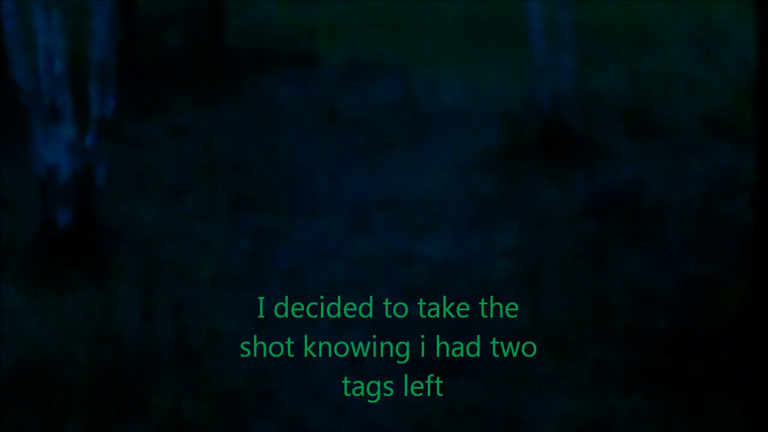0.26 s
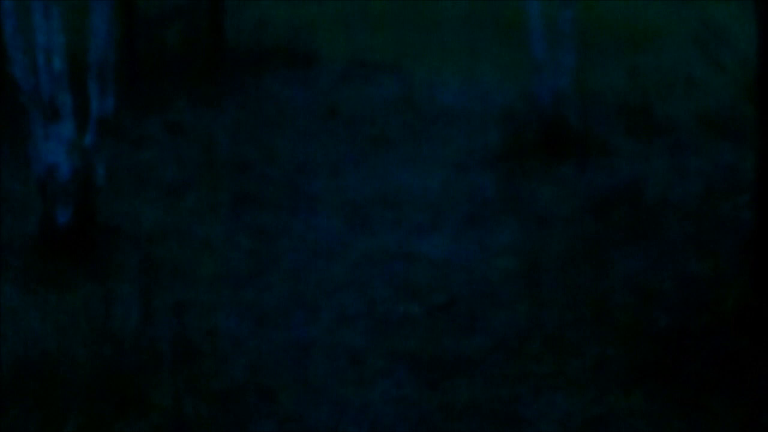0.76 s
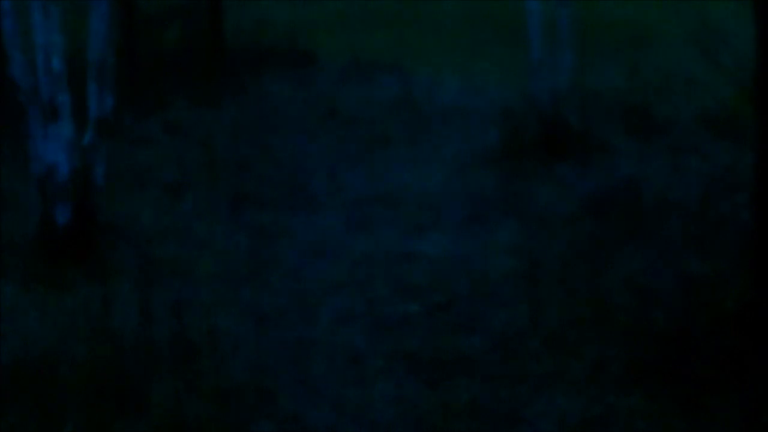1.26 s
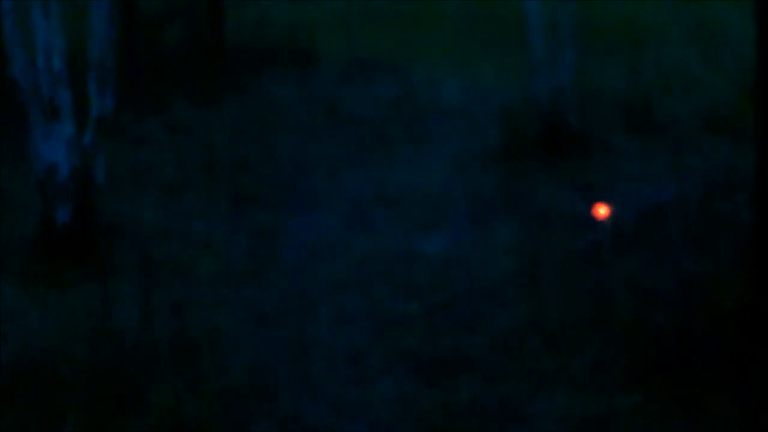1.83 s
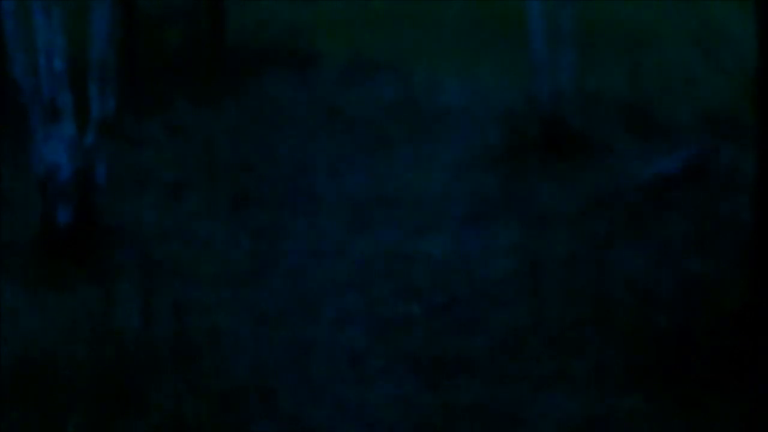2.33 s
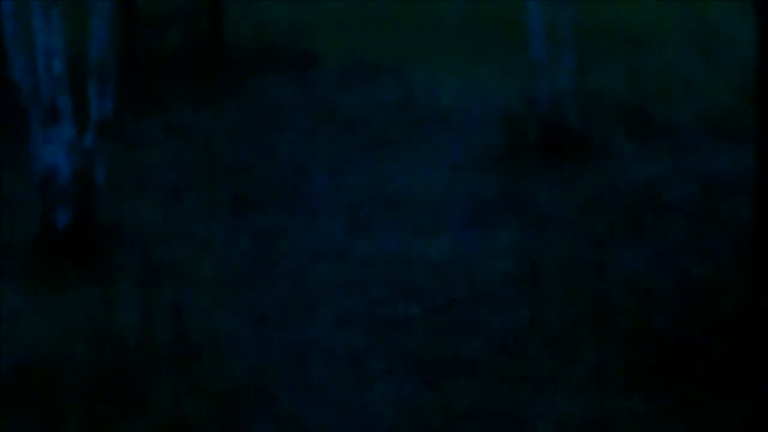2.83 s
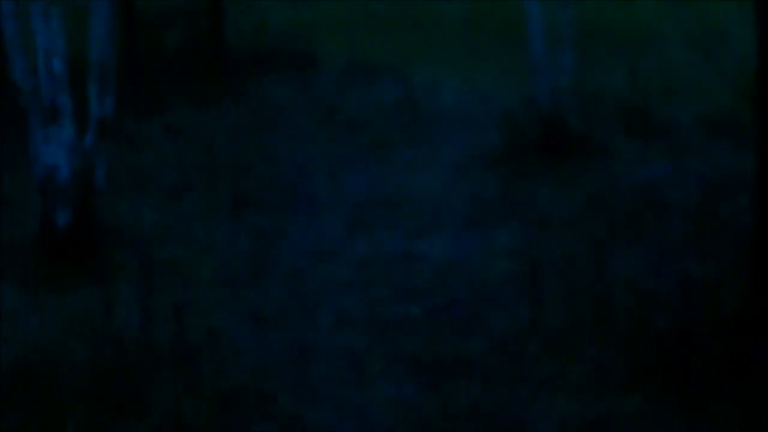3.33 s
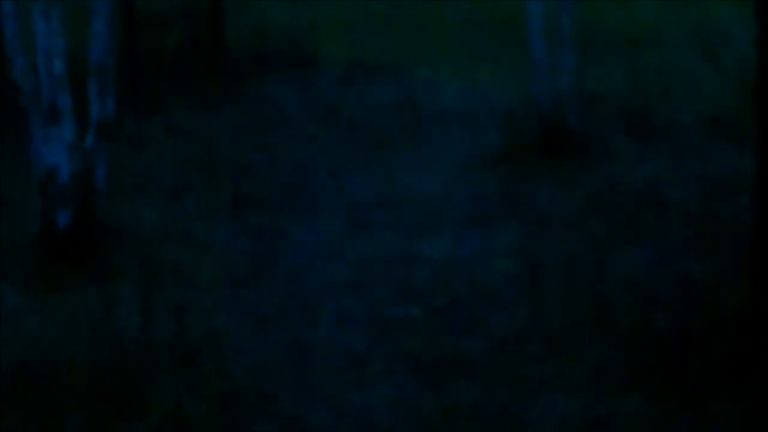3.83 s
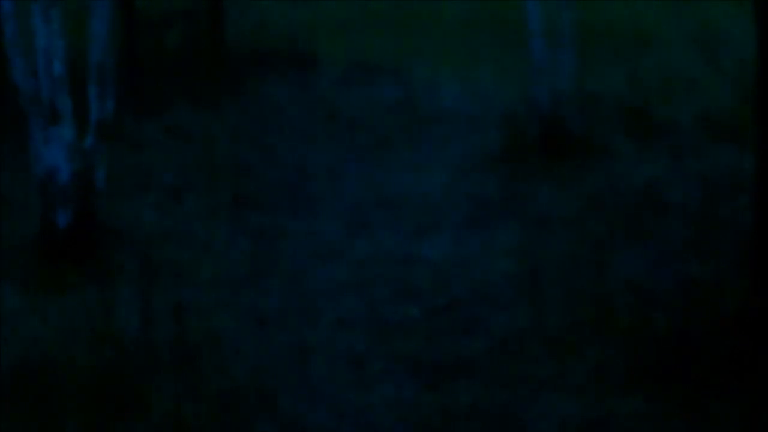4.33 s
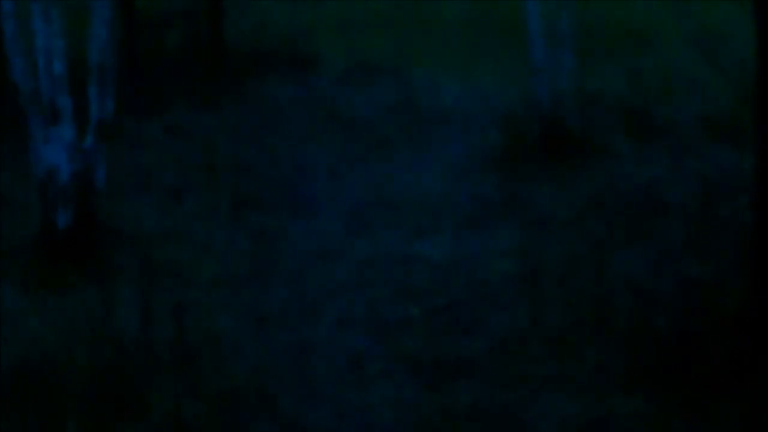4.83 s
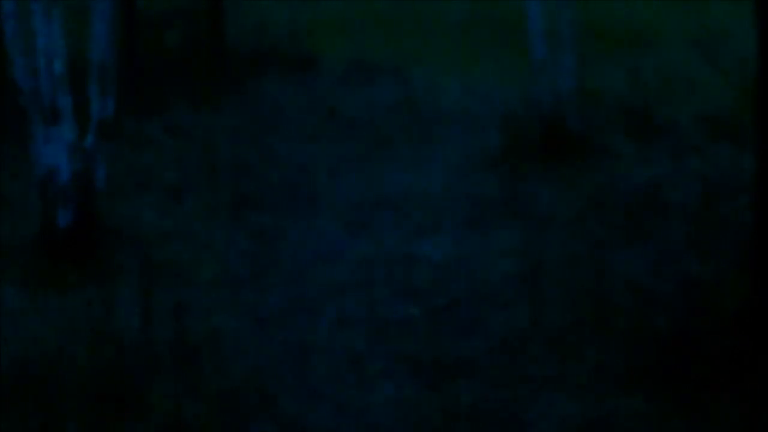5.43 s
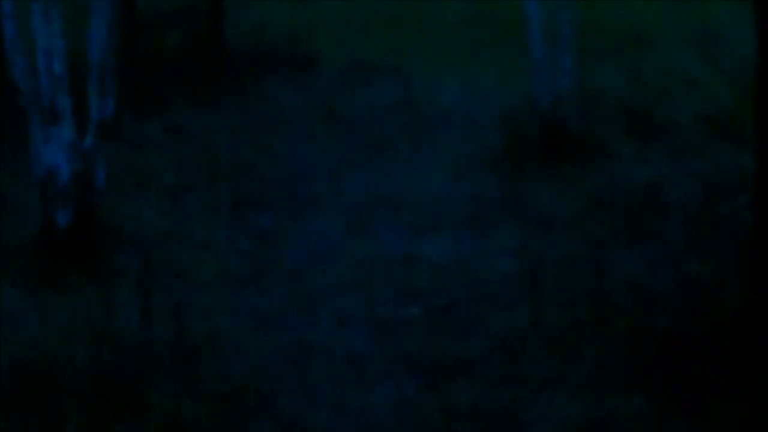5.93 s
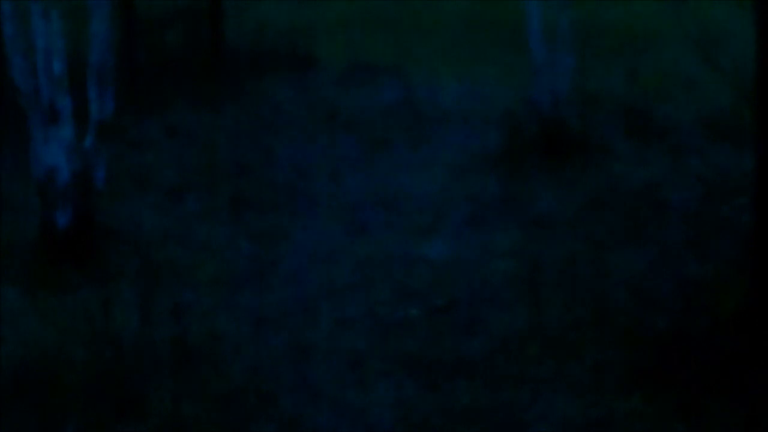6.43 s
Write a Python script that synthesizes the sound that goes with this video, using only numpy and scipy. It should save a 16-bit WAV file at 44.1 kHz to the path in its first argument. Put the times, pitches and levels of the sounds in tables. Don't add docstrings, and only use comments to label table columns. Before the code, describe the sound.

Light rain falls in woods from the start: a fine steady hiss with separate crisp ticks of drops on near leaves, over soft low air rumble and faint hiss. At about 1.56 s a bowstring is released with a tiny scrape and slaps hard at 1.58 s, dry and woody, with a short limb rattle. The rain drops in level, then creeps back. At 1.93 s a small dull arrow strike sounds farther off with a faint echo. At 2.36 s a very sharp, bright branch crack bursts out, briefly answered by the trunks; the rain ducks again. From 2.0 to 3.4 s leaves rustle and twigs tick as an animal bolts, busiest around 2.9 to 3.3 s. Then rain and scattered drips continue, one loud tick near 4.09 s. Around 5.35 s a breeze shakes water down, and a short cloth rub comes at 5.7 s. Patter continues to the end at about 6.6 s.

```python
import sys
import numpy as np
from scipy import signal
from scipy.fft import rfft, irfft, next_fast_len
from scipy.io import wavfile
from scipy.ndimage import uniform_filter1d, map_coordinates

SR = 44100
rng = np.random.default_rng(int(sys.argv[2]) if len(sys.argv) > 2 else 0)


def master(y):
    cut = np.clip(np.atleast_2d(y).T, -1, 1)
    pcm = np.round(cut * 32767)
    wavfile.write(sys.argv[1], SR, pcm.astype(np.int16))


def invert_db(level):
    return 10 ** (np.asarray(level, dtype=float) / 20)


N = 294147


def unit(x):
    return x / np.sqrt(np.mean(x ** 2) + 1e-20)


def peak(x):
    return x / np.max(np.abs(x))


def along(points, hz):
    point_hz, value = np.transpose(points)
    return np.interp(np.log(hz + 1), np.log(point_hz + 1), value)


def curves(rows):
    s, *columns = np.transpose(rows)
    t = np.arange(N) / SR
    return [np.interp(t, s, column) for column in columns]


def swell_db(rows, rise_s, fall_s):
    t = np.arange(N) / SR
    total_db = 0
    for s, db, hold_s in rows:
        ramp_in = (t - s) / rise_s
        ramp_out = 1 - (t - s - hold_s) / fall_s
        total_db = total_db + db * np.clip(np.minimum(ramp_in, ramp_out), 0, 1)
    return total_db


def coloured(x, *spectra):
    m = 2 * next_fast_len(N // 2 + 4096)
    hz = np.fft.rfftfreq(m, 1 / SR)
    gain = np.maximum(invert_db(sum(along(s, hz) for s in spectra)), 1e-4)
    cepstrum = irfft(np.log(gain), m)
    cepstrum[1:m // 2] *= 2
    cepstrum[m // 2 + 1:] = 0
    return irfft(rfft(x, m) * np.exp(rfft(cepstrum)), m)[:N]


def patchy(patchy_db):
    z = signal.stft(rng.standard_normal(N + 512), nperseg=512)[2]
    field = uniform_filter1d(rng.standard_normal(z.shape), size=8, axis=0)
    field = uniform_filter1d(field, size=8, axis=1)
    noise = signal.istft(z * invert_db(patchy_db * unit(field)), nperseg=512)[1]
    return unit(noise[:N])


def add(track, s, sound):
    part = track[round(s * SR):][:len(sound)]
    part += sound[:len(part)]


def ring(hz, t60, t):
    return np.sin(2 * np.pi * hz * t) * invert_db(-60 * t / t60)


# frequency in Hz, level in dB per Hz.
AIR_SPECTRUM = [(12, -25), (20, 3.5), (107, -0.5), (287, -9.5), (427, -13.5), (663, -16), (784, -17.5),
                (3000, -30), (3900, -40), (6600, -120)]


def air():
    gust_db = swell_db([(5.35, 3.2, 0.35)], rise_s=0.26, fall_s=0.45)
    return invert_db(-50.5 + gust_db) * unit(coloured(patchy(patchy_db=1.0), AIR_SPECTRUM))


# frequency in Hz, level in dB per Hz.
HOUSING = [(240, -23), (400, -20), (481, -9.5), (676, -18.5), (777, -15), (994, -13.5), (1730, -11),
           (3930, -9), (4800, -7), (6340, -4.5), (7060, -12), (8760, 0), (11600, -15.5), (15300, -19),
           (16000, -22)]
# start in seconds, lift over the rain in dB, hold in seconds.
RUSTLES = [
    (.75, -1, 0.29),
    (2.03, 4, 0.34),
    (2.22, 6, 0.26),
    (2.55, 8.5, 0.076),
    (2.82, 7.5, 0.25),
    (3.13, 5, 0.14),
    (4.45, 1.5, 0.12),
    (5.35, 4, 0.47),
]


def rain(count=4000):
    draw, t = rng.random((count, 4)), np.arange(128) / SR
    hz = 1200 * 9 ** draw[:, 1:2] ** 0.68
    size = invert_db(np.minimum(-5 * np.log(1 - draw[:, 2:3]), 14))
    grains = size * ring(hz, 4 / hz + 0.002, t)
    at = (draw[:, :1] * N).astype(int) + np.arange(len(t))
    near = np.bincount(at.ravel(), grains.ravel(), N + len(t))[:N]
    clumps = map_coordinates(rng.standard_normal(N // 2048 + 4), [np.arange(N) / 2048])
    near *= invert_db(1.5 * clumps)
    stir_db = swell_db(RUSTLES, rise_s=0.075, fall_s=0.13)
    near_gain = invert_db(-6.0 - 0.43 * stir_db)
    mix = patchy(patchy_db=1.55) + near_gain * unit(near)
    return invert_db(-54 + stir_db) * unit(coloured(mix, HOUSING))


# start in seconds, depth in dB, hold in seconds, creep back in seconds.
DUCKS = [
    (1.605, -17, 0.27, 0.42),
    (2.348, -11.5, 0.26, 0.16),
]


def duck_db():
    return sum(swell_db([(s, db, hold_s)], rise_s=0.068, fall_s=back_s) for s, db, hold_s, back_s in DUCKS)


# frequency in Hz, level in dB.
SNAP_TILT = [(500, -4), (1500, -2.5), (4000, -3.5), (7300, -5), (8700, 3.5), (10500, -2.5), (15500, -3)]


def taps(rows, spike, swings, splash):
    out, t = np.zeros(N), np.arange(2048) / SR
    housing = coloured(np.arange(N) == 0, HOUSING, SNAP_TILT)[:512]
    dull = np.gradient(ring(1000, 0.004, t[:256]))
    rise = np.clip(t / 0.0008, 0, 1) ** 3
    for s, db, hz, ring_db, knock_db, t60 in rows:
        grit = rng.standard_normal((3, len(t)))
        grit[:, 36] = spike
        blow = invert_db(-60 * t / t60)
        after = splash * invert_db(-60 * t / (6 * t60))
        snap, rough, thud = rise * (blow + after) * grit
        leaf = np.gradient(ring(hz, swings / hz + 0.00094, t[:256]))
        add(out, s, invert_db(db - 3.5) * peak(signal.fftconvolve(snap, housing)))
        add(out, s, invert_db(db + ring_db + 6.5) * peak(signal.fftconvolve(rough, leaf)))
        add(out, s, invert_db(db + knock_db - 8.0) * peak(signal.fftconvolve(thud, dull)))
    return out


# start in seconds, peak in dB, leaf pitch in Hz.
FAINT = [(0.1795, -35, 5500), (0.3344, -43, 5480), (0.902, -35, 4060), (1.4711, -41, 1820),
         (1.5, -32, 2060), (2.8499, -33, 2200), (3.4983, -30, 4580), (3.533, -29, 6450),
         (3.6386, -36, 6120), (3.6544, -39, 5590), (4.006, -41, 5560), (4.1614, -25, 6490),
         (4.2154, -35, 6370), (4.344, -30, 4980), (4.364, -32, 4640), (4.5126, -24, 6380),
         (4.531, -25, 5570), (4.7264, -35, 1850), (4.7454, -43, 5030), (4.7925, -28, 5440),
         (4.9134, -27, 5130), (4.9554, -38, 5770), (5.8424, -31, 6370), (5.885, -44, 5470),
         (5.9204, -33, 5660), (6.2138, -37, 5730), (6.4318, -32, 4200), (6.4707, -37, 6470),
         (6.5889, -50, 4910), (6.6044, -46, 6370)]
# start in seconds, peak in dB, pitch in Hz, ring in dB.
LIGHT_TICKS = [(0.0484, -36.5, 6250, -5), (0.129, -37, 6430, -11), (0.196, -30, 5630, -11.5),
               (0.2718, -46, 5060, -12), (0.398, -28.5, 3900, -8.5), (0.4063, -34, 2900, -7),
               (0.49, -37, 3010, -6), (0.5269, -27.5, 3420, -1), (0.601, -37.5, 8100, -2),
               (0.6402, -32, 3460, -9), (0.7457, -31, 5550, -12), (0.7874, -36, 9300, -3),
               (0.822, -29, 4240, -6.5), (0.8337, -28, 4200, -2), (0.8444, -35, 6430, -8),
               (0.8554, -33, 6430, -10), (0.8806, -35.5, 5740, -3), (0.986, -36, 2580, -6.5),
               (1.086, -32, 4950, -5.5), (1.1121, -32, 5660, -6), (1.1388, -33, 5570, -16),
               (1.2421, -41, 6210, -10), (1.3238, -37.5, 6300, -10), (1.3739, -38, 5370, -3),
               (1.5177, -31, 5060, -19), (3.471, -37, 5140, -1.5), (3.5088, -37, 5160, -3),
               (3.583, -40, 5230, 3.5), (3.687, -25.5, 6450, -15), (3.8369, -35, 5610, -2.5),
               (2.116, -37, 5160, -13), (2.2032, -30, 5620, -24), (2.2793, -30.5, 3200, -3.5),
         (2.4325, -28.5, 6470, -18), (2.5361, -43, 8700, -1), (2.634, -43, 3710, -6),
         (2.6439, -38, 5730, -8), (2.6766, -37, 8600, 1), (2.7874, -39, 6500, -18), (2.807, -38, 6240, -18),
         (2.8715, -22.5, 6450, -8.5), (2.9334, -38, 5430, -16), (2.9764, -39, 2800, 5),
         (2.9858, -24, 3140, -18), (3.001, -24, 5600, -4.5), (3.011, -26, 6410, -20),
         (3.026, -23.5, 4660, -9), (3.055, -31, 6430, -18), (3.0828, -31.5, 6460, -19),
         (3.144, -26.5, 6400, -16), (3.1785, -31, 6420, -14), (3.1968, -27.5, 5670, -4.5),
         (3.214, -27, 6430, -12), (3.2243, -22, 4000, -17), (3.2338, -17.5, 5730, -27),
         (3.2859, -28, 6350, -15), (3.3088, -37, 9000, 0), (3.3634, -34, 4210, -11),
         (3.3992, -36, 6350, -16), (3.422, -33, 4580, -19),
               (3.8571, -35, 6330, -6), (3.883, -30, 4470, -12), (4.0406, -34, 4290, -2),
         (4.0647, -29, 5770, -25), (4.0868, -15, 6670, -22), (4.096, -33, 6420, -14),
         (4.125, -32, 5060, -14), (4.1564, -26.5, 5440, -6.5), (4.1926, -36, 4450, -1.5),
         (4.2446, -26.5, 5680, -11), (4.296, -26, 5150, -17), (4.4287, -31.5, 5280, -19),
         (4.4947, -27.5, 6050, -32), (4.5909, -31, 5760, -12), (4.6423, -35, 4190, -8),
         (4.677, -27.5, 4840, -12), (4.6874, -39, 6050, -14), (4.7, -28, 5350, -20),
         (4.8197, -28, 6310, -23), (4.8594, -30, 5570, -16), (5.068, -31.5, 5700, -10),
         (5.148, -32, 4180, -26), (5.199, -28, 6440, -28), (5.4162, -28.5, 6500, -11),
         (5.5522, -22.5, 2730, -23), (5.771, -22, 5000, -18), (6.4183, -43.5, 4070, 3.5),
         (6.4897, -34, 6320, -6), (6.521, -25.5, 2800, -11), (6.6535, -27, 3090, -22)]
# start in seconds, peak
# in dB, pitch in Hz, ring in dB, knock in dB.
HEAVY = [(0.2518, -35, 2060, -6, 10), (1.065, -30, 4700, -1, -4), (1.1076, -32, 6500, -13, 1),
         (2.1505, -45, 5640, 2, -12), (2.9108, -29.5, 5140, -8, -2), (3.6174, -33, 5640, -13, -10),
         (3.73, -35, 6230, -10, -18), (3.9357, -35.5, 5600, -2, 5.5), (4.2062, -35, 6400, -5, -14),
         (4.539, -32, 5570, -5, -18), (5.2486, -31.5, 6400, -6.5, -5), (5.288, -34, 3820, -8, -10),
         (5.403, -30, 4600, -8, -5), (5.4511, -35, 4950, -14, 4), (5.4774, -28.5, 2140, -19, -9),
         (5.5338, -26, 5680, -16, -7), (5.6407, -35, 5630, -12, -3), (5.9607, -33.5, 6470, -12, -5),
         (5.9886, -31.5, 4040, -19, -10), (6.031, -33, 5270, -12, -6), (6.1273, -41, 3480, -3, -3),
         (5.6255, -47, 1500, 0, 6), (5.752, -42, 1600, -2, 1), (5.7817, -40, 1400, -3, 5)]


def drops():
    faint = [(s, db - 5.5, hz, -13.5) for s, db, hz in FAINT]
    light = [(*row, -39) for row in LIGHT_TICKS + faint]
    rows = [(s, db - 0.53, *rest, 0.013) for s, db, *rest in light + HEAVY]
    return taps(rows, spike=7.3, swings=2.0, splash=0.21)


# time in seconds, level in dB, fold resonance in Hz.
SLEEVE = [
    (5.58, -73, 5810),
    (5.675, -56, 5720),
    (5.69, -47.5, 5600),
    (5.735, -51, 4950),
    (5.759, -45.5, 4550),
    (5.79, -50, 4280),
    (5.805, -55, 4200),
    (5.86, -62, 4100),
]


def sleeve():
    db, hz = curves(SLEEVE)
    t = np.arange(N) / SR
    gate = np.clip(np.minimum(t - SLEEVE[0][0], SLEEVE[-1][0] - t) / 0.028, 0, 1)
    catch = rng.standard_normal((3, N)) * invert_db(4.9 * rng.standard_normal(N))
    narrow = uniform_filter1d(catch[:2], size=26, axis=1)
    turn = 2 * np.pi * np.cumsum(hz) / SR
    fold = unit(narrow[0] * np.cos(turn) + narrow[1] * np.sin(turn))
    cloth_tilt = [(60, -13), (400, 7.0), (2000, -11), (8500, -2), (12000, -13)]  # Hz, dB
    dull = unit(coloured(catch[2], cloth_tilt))
    return gate * invert_db(db) * (0.99 * fold + 0.88 * dull)


# frequency in Hz, level in dB.
ECHO_TILT = [(1000, -6), (3000, -2), (5500, 0.5), (9000, 1.5)]
# start in seconds, level in dB, t60 in seconds.
ECHOES = [
    (1.93, -51.5, 0.45),
    (2.363, -41.5, 0.45),
]


def woods():
    level, t = np.zeros(N), np.arange(SR // 2) / SR
    for s, db, t60 in ECHOES:
        add(level, s, invert_db(db - 60 * t / t60))
    return level * unit(coloured(patchy(patchy_db=0.9), HOUSING, ECHO_TILT))


# start in seconds, peak in dB, pitch in Hz, ring in dB, t60 in seconds.
CRACKS = [
    (1.931, -28, 2000, -16, 0.022),
    (1.9304, -43, 4800, 1.5, .006),
    (1.9583, -39, 8000, -11, 0.0091),
    (2.3589, -7.5, 2600, -16, 0.0024),
    (2.36, -22, 8400, 0, 0.012),
    (2.362, -31, 2600, 0, 0.005),
    (2.3693, -33, 6360, -13, .006),
    (2.3738, -34, 8700, -2, 0.012),
    (1.9962, -52, 9000, -2, 0.0073),
    (2.0135, -59, 8600, -2, .008),
]


def cracks():
    dull_db = -49
    rows = [(s, db, hz, ring_db, dull_db - db, t60) for s, db, hz, ring_db, t60 in CRACKS]
    return taps(rows, spike=3.7, swings=7.3, splash=0.12)


# pitch in Hz, knock in dB.
LIMB_KNOCK = [(2000, -14), (2800, -8), (5500, -32)]
# start in seconds, peak in dB, pitch in Hz, ring in dB, t60 in seconds.
CONTACTS = [(1.559, -34, 4700, -2, .02), (1.5663, -28.5, 8850, -1, 0.012), (1.5734, -32, 8500, -1, .012),
            (1.5827, -14, 5900, -19, 0.0032), (1.584, -13.5, 3150, -5.5, 0.0059),
            (1.586, -7, 5830, -17, 0.0057), (1.591, -20, 5970, -12, 0.0083),
            (1.6153, -26.5, 1900, -10, 0.005), (1.62, -34, 6240, 0, 0.0076), (1.635, -43, 3400, -3, 0.012),
            (1.798, -54.5, 5530, 1, .006)]


def string_contacts():
    rows = [(s, db, hz, ring_db, along(LIMB_KNOCK, hz), t60) for s, db, hz, ring_db, t60 in CONTACTS]
    return taps(rows, spike=3.7, swings=7.3, splash=0.12)


# frequency in Hz, level in dB.
BOW_TILT = [(300, 5), (1500, 5.5), (4000, -1), (9000, -3.5), (15000, 3)]
# time in seconds, level in dB.
STRING = [
    (1.559, -59),
    (1.5605, -36),
    (1.565, -40),
    (1.57, -46),
    (1.585, -19),
    (1.59, -50),
    (1.61, -41),
    (1.65, -51.5),
    (1.72, -69.5),
]
# start in seconds, peak in dB, pitch in Hz, t60 in seconds.
SLAPS = [(.2515, -30, 610, .019), (1.562, -35, 2800, .012), (1.577, -24, 260, .015),
         (1.5845, -22, 560, .01), (1.5842, -12, 1030, .011), (1.5842, -25, 105, .04),
         (1.5922, -20, 800, .007), (1.6015, -30, 650, .012), (1.6225, -41, 2050, .016),
         (1.6362, -40, 1950, .016), (1.9312, -39, 940, .016), (1.9312, -49, 300, .025),
         (1.9312, -49, 110, .04), (1.961, -51, 1050, .02), (2.1515, -38.5, 880, .038),
         (2.3595, -32, 420, .007), (2.3597, -31, 1100, .003), (2.3598, -19, 3700, .002),
         (2.3598, -24, 2100, .003), (2.3598, -1, 8700, .003), (2.3599, -9, 5500, .005),
         (2.605, -43, 90, .1), (2.73, -40, 70, .12), (5.626, -35, 400, .012), (5.752, -32, 480, .016),
         (6.4, -42, 400, .008)]


def bow():
    uneven_db = 3 * rng.standard_normal(N // 24 + 1).repeat(24)[:N]
    grit = rng.standard_normal(N) * invert_db(uneven_db)
    out = invert_db(curves(STRING)[0]) * unit(coloured(grit, HOUSING, BOW_TILT))
    t = np.arange(4096) / SR
    onset = 1 - np.exp(-t / 0.0003)
    for s, db, hz, t60 in SLAPS:
        add(out, s, invert_db(db) * ring(hz, t60, t) * onset)
    return out


def scene():
    bed = invert_db(duck_db()) * (air() + rain())
    near = drops() + sleeve()
    shot = woods() + cracks() + string_contacts() + bow()
    return (bed + near + shot)[None]


def low_pass(x):
    return signal.sosfilt(signal.butter(12, 16850, fs=SR, output="sos"), x)


# frequency in Hz, level in dB.
BAND_EDGE = [(15800, 0), (16000, -24), (16750, -30), (16900, -70)]


def record(dry):
    hiss = invert_db(-72) * rng.standard_normal(N)
    heard = coloured(dry[0] + hiss, BAND_EDGE)[None]
    return low_pass(heard)


dry = scene()
out = record(dry)
master(out)
```